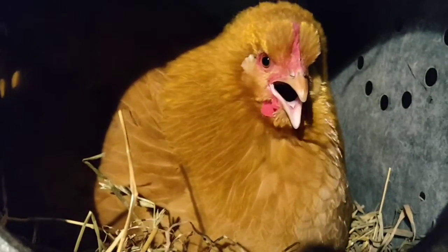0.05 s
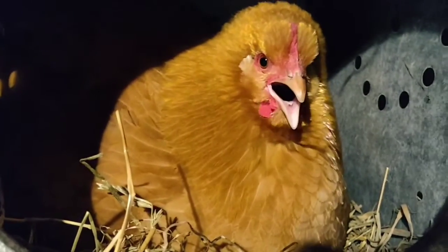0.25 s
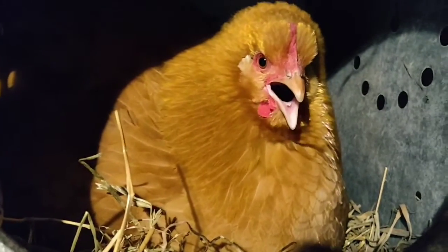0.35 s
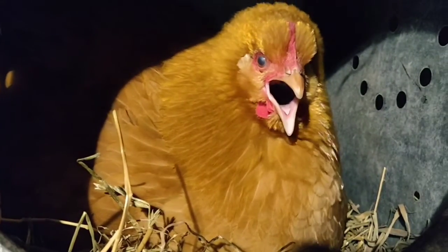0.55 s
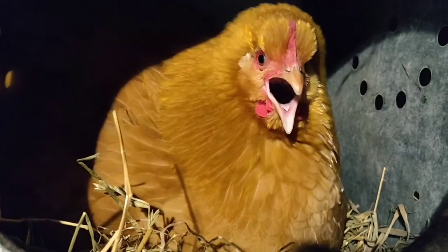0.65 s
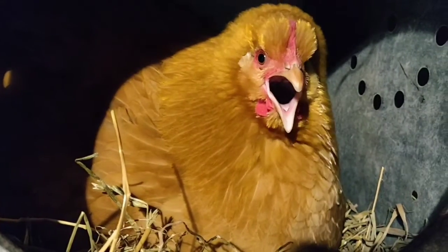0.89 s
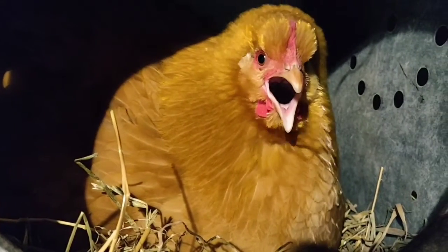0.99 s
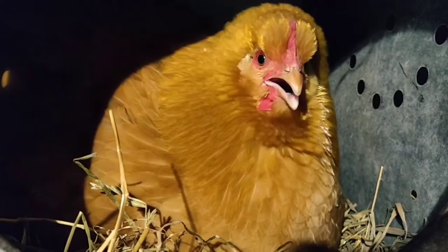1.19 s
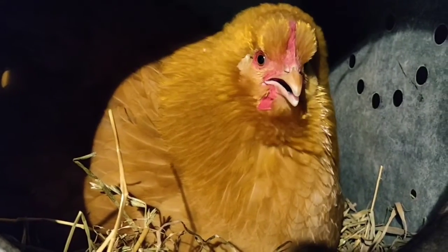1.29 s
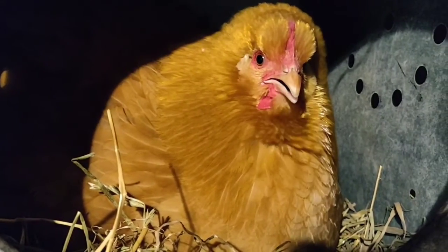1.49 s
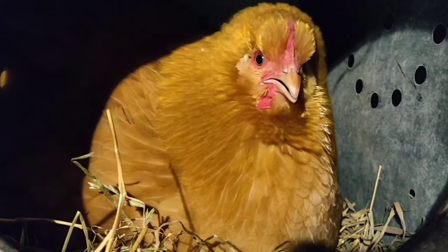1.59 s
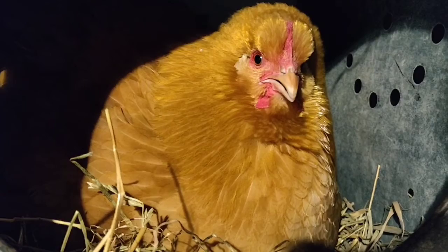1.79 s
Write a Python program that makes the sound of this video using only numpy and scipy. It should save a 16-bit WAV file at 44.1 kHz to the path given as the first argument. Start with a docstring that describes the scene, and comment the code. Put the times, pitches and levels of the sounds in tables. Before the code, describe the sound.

Close, raspy hen squawk: choppy croaking clucks build into a loud growling screech, then break off

```python
"""A broody hen in a nest box, close to a phone, over hissing coop air and a low rumble that dies away.
A stutter of rough clucks and croaks: the syrinx pulses unevenly, with a burst of breath in each cycle.
They grow into one long rasping squawk: the pulses flutter and the beak opens, brightening the throat.
It breaks up into a few last calls, then air. The box answers briefly throughout; the two microphone
ports colour the treble differently and a limiter holds the peaks."""
import sys
import numpy as np
from scipy import signal
from scipy.fft import rfft, irfft, next_fast_len
from scipy.io import wavfile
from scipy.ndimage import uniform_filter1d, minimum_filter1d

SR = 44100
rng = np.random.default_rng(int(sys.argv[2]) if len(sys.argv) > 2 else 0)


def materialize(psi):
    """Save the field psi as 16-bit PCM at rate SR to the path in sys.argv[1].

    A 1-D psi becomes a single channel; in a 2-D psi each row is a channel.
    """
    bounded = np.clip(np.atleast_2d(psi).T, -1, 1)
    quanta = np.round(bounded * 32767).astype(np.int16)
    wavfile.write(sys.argv[1], SR, quanta)


def ratio_of_db(decibels):
    """Turn decibels (scalar or array-like) into linear amplitude factors; 0 dB maps to 1."""
    return 10 ** (np.asarray(decibels, float) / 20)


N = 81585

# clucks, slow to rise: start_s, length_s, level_db, first_pitch_hz, last_pitch_hz
CLUCKS = [(0.107, 0.034, -33, 748, 511.4), (0.168, .026, -27.5, 597, 615.1),
          (0.216, 0.03, -19.5, 563.3, 703.2), (0.27, 0.028, -18.5, 574.5, 538),
          (0.301, 0.02, -28.5, 642.5, 484.2), (0.315, .028, -19, 483.2, 337.2),
          (0.4, .013, -41, 598, 620.3), (0.548, .027, -15, 420, 402.3), (0.6, .039, -14, 459.2, 597),
          (1.301, 0.029, -14, 401.2, 430.9)]
# croaks that burst out, some after a false start: start_s, length_s, level_db, first_pitch_hz, last_pitch_hz
CROAKS = [(0.02, .026, -31.5, 158.2, 220.1), (0.217, .002, -31, 702, 695), (0.273, 0.0019, -30, 701, 707),
          (0.358, .003, -36, 601, 597.7), (0.369, 0.025, -17.5, 322.5, 299.6),
          (0.422, .035, -15.5, 333, 376.7), (0.486, .011, -31, 258, 256.7),
          (0.494, 0.026, -17.5, 278.9, 309.9), (1.367, 0.0059, -30, 294.2, 306.6),
          (1.373, 0.022, -16.5, 427.2, 408.3), (1.436, 0.019, -23.5, 234.9, 217.9)]
# clean yelps on the throat resonance, low hoots on the chest: peak_s, level_db, pitch_hz, time_to_minus_20_db_s
YELPS = [(.245, -11, 1319, 0.002), (0.329, -15.5, 1320, 0.0055), (.573, -11.5, 1229, 0.0071),
         (0.629, -19, 1263, .005), (1.262, -17.5, 1306, 0.0044), (1.276, -14, 1290, 0.0058),
         (1.333, -8, 1206, 0.0094), (.036, -38, 196.3, 0.012), (1.457, -28.5, 228.5, 0.018)]
# squawk, before flutter and scatter: time_s, level_db, pitch_hz, flutter_rate_hz
SQUAWK = [(0.66, -36, 586.6, 42), (0.666, -17, 593.4, 42), (0.678, -10.5, 603, 42), (0.736, -12, 702.6, 42),
          (0.874, -9.5, 674.6, 42.2), (0.954, -10, 572, 41), (1.098, -8, 654.6, 40.8),
          (1.216, -10, 565.7, 42), (1.28, -16.5, 538.7, 32.3), (1.296, -29.5, 521.3, 38.5)]
# pitch sweep within a flutter, also weights its slap: time_s, sweep_share
SWEEP = [(.66, .1), (.72, .16), (.78, .36), (1.2, .4), (1.3, .3)]
# beak: time_s, opening_0_to_1
BEAK = [(0, 0.28), (.13, 0.27), (.19, 0.56), (.25, 0.77), (.45, 0.7), (.75, 0.95), (1.25, 0.98),
        (1.39, 0.7), (1.45, 0.64)]
# share of breath in the source, also scales the scatter: time_s, roughness_0_to_1
ROUGHNESS = [(0, .75), (.1, .14), (.15, .2), (.19, .45), (.3, .45), (.4, .55), (.62, .5), (.7, .34),
             (1.28, .42), (1.31, .3), (1.46, .3)]
# rounding of the pulses: freq_hz, gain_db
PULSE_TONE = [(1600, 0), (3000, -6), (9000, -8)]
# breath, thin in the bass: freq_hz, gain_db
BREATH_TONE = [(300, -12), (1000, -7), (2500, 3), (9000, 3)]
# throat, beak shut, before levelling: freq_hz, gain_db
THROAT_SHUT = [(60, -44.5), (170, -6.5), (205, -7), (228, 1.5), (255, -1.5), (320, -13.5), (450, -1),
               (620, 5), (900, 0), (1200, -14), (1700, -31.5), (3000, -40.5), (6000, -36)]
# throat, beak open, before levelling: freq_hz, gain_db
THROAT_OPEN = [(100, -42), (300, -23.5), (600, -14.5), (760, -15), (930, -27.5), (1150, -2), (1340, 2),
               (1480, -5), (1620, -21), (1850, -13.5), (2080, -16), (2350, -16.5), (2750, -19.5),
               (3000, -14), (3300, -14.5), (3700, -14.5), (4200, -18), (4650, -13), (5050, -19),
               (5350, -12.5), (5700, -9), (6100, -9.5), (9000, -17.5), (9700, -25), (11500, -41.5),
               (16000, -58.5)]
# left port response: freq_hz, gain_db
LEFT_PORT = [(100, 7.5), (1300, 3.5), (4700, 3), (5700, 3), (6200, -6.5), (6600, -20.5), (7000, -34),
             (7450, -5), (7900, -33.5), (9000, -34.5), (12000, -15.5)]
# right port response: freq_hz, gain_db
RIGHT_PORT = [(100, -1.5), (700, -1.5), (870, 0.5), (1300, -5), (1800, -6.5), (2000, -15.5), (2300, -9.5),
              (3300, -4.5), (4100, -1), (4450, -17), (4700, -8), (5150, -10.5), (5700, -21), (6300, -9),
              (6600, -10), (7000, -11.5), (8600, -5.5), (9400, -24.5), (12000, -19)]
# decay of the box: freq_hz, t60_s
BOX_DECAY = [(200, .3), (1100, 0.32), (1500, 0.16), (3300, 0.12), (4700, 0.053), (5700, 0.3), (6600, 0.12),
             (9000, .1)]
# answer of the box, before the tail scale: freq_hz, relative_db
BOX_LEVEL = [(200, -14), (800, -0.5), (1250, -11.5), (2000, -1.5), (5700, -2.5), (9000, -3)]
# thump of a flutter: freq_hz, relative_db
THUMP_TONE = [(15, -3.5), (40, 10), (90, 4), (200, -6.5), (400, -25.5), (1000, -31)]
# span in which flutters thump: start_s, end_s
THUMP_SPAN_S = (.77, 1.24)
# faint top-band noise, before scaling by the voice's envelope: time_s, level_db
FIZZ_LEVEL = [(0, -36), (.7, -34), (.76, -52), (1.29, -52), (1.32, -36), (1.38, -27), (1.46, -32)]
# fizz band: low_hz, high_hz
FIZZ_BAND_HZ = (13200, 15600)
# rumble, stronger at the left port, before the 3 dB lean each way: time_s, level_db
RUMBLE_LEVEL = [(0, -59), (.15, -59.5), (.3, -66.5), (1.85, -79.5)]
# rumble band: low_hz, high_hz
RUMBLE_BAND_HZ = (75, 125)
# air and hiss spectrum: freq_hz, relative_db_per_hz
AIR_TONE = [(12, -33.5), (20, -8.5), (32, -3.5), (49, -20), (185, -29), (352, -26.5), (404, -31),
            (1720, -43.5), (5530, -35.5), (7730, -46), (15500, -48)]
# likeness of the air at the two ports: freq_hz, correlation
AIR_LIKENESS = [(60, 0.39), (240, 0.63), (950, 0.02), (3770, 0.06), (15000, 0.01)]
# balance of the air: freq_hz, left_over_right_db
AIR_BALANCE = [(60, 3.5), (240, 3), (950, -1.5), (3770, 0), (15000, 2)]

CLUCK_RISE_SHARE, CROAK_RISE_SHARE = 0.49, 0.08  # of the call's length
CALL_RELEASE_S, CALL_DROOP_DB = 0.0035, 0.5  # decay constant after the call; fall over its length
SCOOP = 0.3  # a call's pitch sags mid-way by a quarter of this share
FLUTTER_SCATTER, FLUTTER_DIP_DB = 0.097, 4.5  # log-rate deviation; dip at each restart
SLAP_GAIN_DB, SLAP_SCATTER_DB = 11.5, 4.9  # gain on top of the sweep weight; deviation
JITTER, PULSE_SCATTER_DB = 0.22, 9  # log-rate and size deviation at full roughness
BREATH_DECAY_PER_CYCLE = 2.5  # exponent over one cycle
EFFORT_POWER, EFFORT_REF_DB = 0.58, -15  # extra growth of the breath with gain; gain where it is 1
WALLS_T60_S, WALLS_OVER_DB = 0.012, 18.5  # near walls die first
TAIL_RENEWAL_S = 0.1189  # a fresh random tail fades in this often
THUMP_GAIN_DB = 23.5
AIR_RMS_DB = -57
LIMIT_PEAK, LIMIT_S = 0.99, 0.001


def unit(x):
    """Scales to rms 1."""
    return x / np.sqrt(np.mean(x ** 2) + 1e-20)


def along(points, hz):
    """Interpolates (freq_hz, value) points on a log axis."""
    f, v = np.transpose(points)
    return np.interp(np.log(hz + 1), np.log(f + 1), v)


def curves(rows):
    """One value per sample for each column after the time."""
    s, *cols = np.transpose(rows)
    return [np.interp(np.arange(N) / SR, s, c) for c in cols]


def coloured(x, points):
    """Minimum-phase filter through (freq_hz, gain_db) points, by folding the cepstrum."""
    m = 2 * next_fast_len(N // 2 + 4096)
    gains = ratio_of_db(along(points, np.fft.rfftfreq(m, 1 / SR)))
    cepstrum = irfft(np.log(gains), m)
    cepstrum[1:m // 2] *= 2
    cepstrum[m // 2 + 1:] = 0
    return irfft(rfft(x, m) * np.exp(rfft(cepstrum)), m)[..., :N]


def band(hz):
    """Band noise of rms 1."""
    sos = signal.butter(3, hz, "bandpass", fs=SR, output="sos")
    return unit(signal.sosfilt(sos, rng.standard_normal(N)))


def held(cycles):
    """One normal draw held for each whole cycle."""
    return rng.standard_normal(4000)[cycles.astype(int) % 4000]


def hen():
    """Syrinx source through a throat that crossfades from shut to open with the beak, plus yelps."""
    gain, pitch_hz, slaps = controls()
    source = syrinx(gain, pitch_hz, slaps)
    (beak,) = np.clip(curves(BEAK), 0, 1)
    noise = rng.standard_normal(N)
    voice = yelps()
    for weight, throat in ((1 - beak, THROAT_SHUT), (beak, THROAT_OPEN)):
        level = coloured(noise, throat).std()
        voice = voice + coloured(weight * source, throat) / level
    return voice, slaps


def controls():
    """Gain, pitch and slaps: calls glide; the squawk's pitch climbs and restarts with each flutter."""
    gain, pitch_hz, slaps = squawk()
    t = np.arange(N) / SR
    for calls, rise in ((CLUCKS, CLUCK_RISE_SHARE), (CROAKS, CROAK_RISE_SHARE)):
        for start_s, length_s, level_db, first_hz, last_hz in calls:
            u = (t - start_s) / length_s
            inside = np.clip(u, 0, 1)
            release = np.exp(-np.clip(u - 1, 0, 9) * length_s / CALL_RELEASE_S)
            shape = np.clip(u / rise, 0, 1) * release * (u < 2)
            gain = gain + shape * ratio_of_db(level_db + CALL_DROOP_DB * (1 - inside))
            glide_hz = (first_hz + (last_hz - first_hz) * inside) * (1 - SCOOP * u * (1 - u))
            pitch_hz = np.where((u > 0) & (u < 1.15), glide_hz, pitch_hz)
    return gain, pitch_hz, slaps


def squawk():
    """Forced syrinx flutters unevenly: each restart dips the level, drops the pitch and slaps."""
    t = np.arange(N) / SR
    (level_db, base_hz, rate_hz), (sweep,) = curves(SQUAWK), curves(SWEEP)
    on = (t > SQUAWK[0][0]) & (t < SQUAWK[-1][0])
    beat = np.cumsum(rate_hz * on) / SR
    beat = np.cumsum(rate_hz * on * np.exp(FLUTTER_SCATTER * held(beat))) / SR
    saw = beat % 1
    gain = on * ratio_of_db(level_db - FLUTTER_DIP_DB * (1 - saw) ** 2)
    pitch_hz = base_hz * (1 + sweep * (saw - 0.5))
    restarts = np.diff(np.floor(beat), prepend=0)
    slaps = restarts * ratio_of_db(level_db + SLAP_SCATTER_DB * held(beat)) * sweep
    return gain, pitch_hz, slaps


def syrinx(gain, pitch_hz, slaps):
    """Jittered pulses and gated breath, shared out by roughness, with a slap at each flutter restart."""
    (rough,) = np.clip(curves(ROUGHNESS), 0, 1)
    cycles = np.cumsum(pitch_hz) / SR
    cycles = np.cumsum(pitch_hz * np.exp(JITTER * rough * held(cycles))) / SR
    size = np.sqrt(SR / pitch_hz)  # keeps pulse power even across pitch
    pulses = pulse_train(cycles) * size * ratio_of_db(PULSE_SCATTER_DB * rough * held(cycles + 0.5))
    pulses = coloured(pulses, PULSE_TONE)
    breath = breath_bursts(cycles) * (gain / ratio_of_db(EFFORT_REF_DB)) ** EFFORT_POWER
    tone = np.sqrt(rough) * breath - np.sqrt(1 - rough) * pulses
    return gain * tone - ratio_of_db(SLAP_GAIN_DB) * slaps * size


def pulse_train(cycles):
    """One band-limited pulse per cycle: a windowed sinc at its fractional sample."""
    at = np.interp(np.arange(1, int(cycles[-1])), cycles, np.arange(N))
    k = np.floor(at).astype(int)[:, None] + np.arange(-7, 9)
    d = k - at[:, None]
    kernel = np.sinc(d) * np.cos(np.pi * d / 16) ** 2
    return np.bincount(np.clip(k, 0, N - 1).ravel(), kernel.ravel(), N)


def breath_bursts(cycles):
    """Noise that bursts at the start of each cycle and decays through it."""
    gate = np.exp(-BREATH_DECAY_PER_CYCLE * (cycles % 1))
    return coloured(unit(gate * rng.standard_normal(N)), BREATH_TONE)


def yelps():
    """Clean sines under Gaussian envelopes."""
    t, out = np.arange(N) / SR, np.zeros(N)
    for peak_s, level_db, hz, length_s in YELPS:
        envelope = ratio_of_db(level_db - 20 * ((t - peak_s) / length_s) ** 2)
        out += envelope * np.sin(2 * np.pi * hz * (t - peak_s))
    return out


def box(x):
    """Decaying-noise answer of the nest box, its own at each port, crossfading between random tails."""
    out, place = np.zeros((2, N)), np.arange(N) / SR / TAIL_RENEWAL_S
    for k in range(int(N / SR / TAIL_RENEWAL_S) + 2):
        hz, t, z = signal.stft(rng.standard_normal((2, SR // 3)), SR, nperseg=128)
        late = ratio_of_db(-60 * t / along(BOX_DECAY, hz)[:, None])
        walls = ratio_of_db(WALLS_OVER_DB - 60 * t / WALLS_T60_S)
        z = z * (late + walls)
        z = z / np.sqrt((abs(z) ** 2).sum(2, keepdims=True))  # equal energy per bin
        z = z * ratio_of_db(along(BOX_LEVEL, hz))[:, None]
        tail = signal.istft(z * 0.0078, SR, nperseg=128)[1]  # tail scale
        fade = np.sqrt(np.clip(1 - abs(place - k), 0, 1))
        out += signal.fftconvolve((x * fade)[None], tail, axes=1)[:, :N]
    return out


def thumps(slaps):
    """Low thump of each flutter within the span."""
    t = np.arange(N) / SR
    inside = (t > THUMP_SPAN_S[0]) & (t < THUMP_SPAN_S[1])
    return ratio_of_db(THUMP_GAIN_DB) * coloured(slaps * inside, THUMP_TONE)


def fizz(voice):
    """Faint top-band noise, scaled by the voice's envelope; used opposite in the two channels."""
    return ratio_of_db(curves(FIZZ_LEVEL)[0]) * band(FIZZ_BAND_HZ) * uniform_filter1d(abs(voice), size=200)


def rumble():
    """Low band noise that dies away, 6 dB stronger at the left port."""
    return ratio_of_db(curves(RUMBLE_LEVEL)[0]) * band(RUMBLE_BAND_HZ) * ratio_of_db([[3], [-3]])


def air():
    """Coop air and microphone hiss: two noises rotated to a correlation that is highest in the bass."""
    hz = np.fft.rfftfreq(N, 1 / SR)
    a, b = rfft(rng.standard_normal((2, N))) * ratio_of_db(along(AIR_TONE, hz))
    turn = np.arccos(np.clip(along(AIR_LIKENESS, hz), 0, 1)) / 2
    lean = ratio_of_db(along(AIR_BALANCE, hz) / 2)
    left = (np.cos(turn) * a + np.sin(turn) * b) * lean
    right = (np.cos(turn) * a - np.sin(turn) * b) / lean
    return ratio_of_db(AIR_RMS_DB) * unit(irfft([left, right], N))


def scene():
    """Hen and box coloured by each port; fizz opposite in the two, thumps left only; air and rumble."""
    voice, slaps = hen()
    near = voice + box(voice)
    top = fizz(voice)
    left = coloured(near[0], LEFT_PORT) + top + thumps(slaps)
    right = coloured(near[1], RIGHT_PORT) - top
    return np.array([left, right]) + air() + rumble()


def limiter(x):
    """Look-ahead limiter: the lowest gain needed nearby, smoothed, shared by both channels."""
    span = int(LIMIT_S * SR)
    need = np.minimum(1, LIMIT_PEAK / (abs(x).max(0) + 1e-9))
    return x * uniform_filter1d(minimum_filter1d(need, 2 * span + 1), span)


def roll_off(x):
    """The treble ends steeply here."""
    return signal.sosfilt(signal.butter(12, 15750, fs=SR, output="sos"), x)


def record(dry):
    """Holds the peaks and delivers the finished mix."""
    mix = limiter(dry)
    return roll_off(mix)


dry = scene()
out = record(dry)
materialize(out)
```